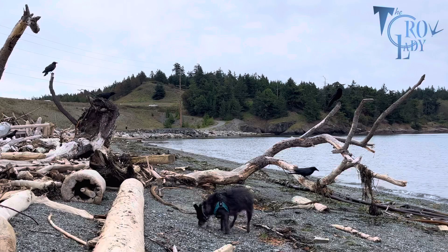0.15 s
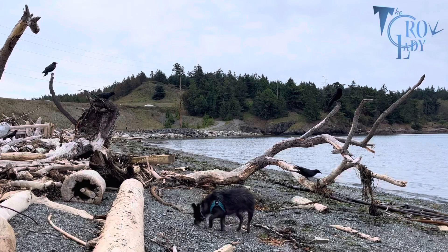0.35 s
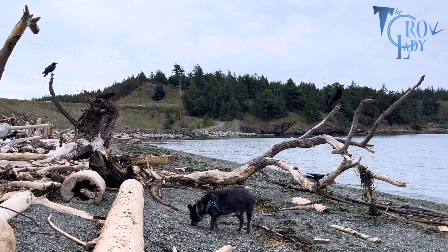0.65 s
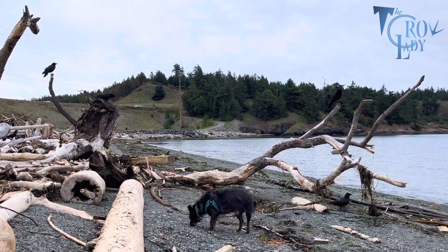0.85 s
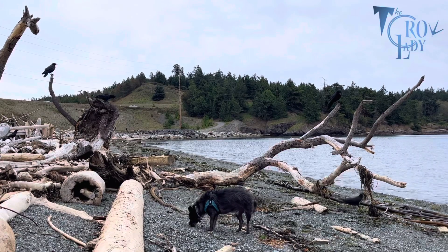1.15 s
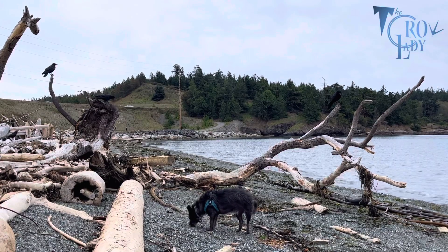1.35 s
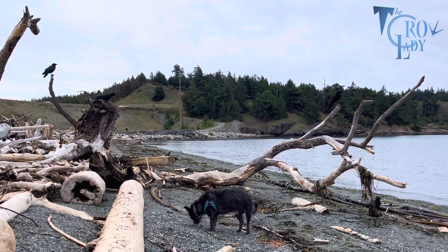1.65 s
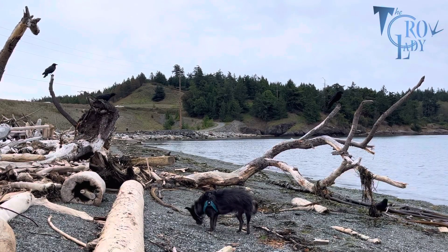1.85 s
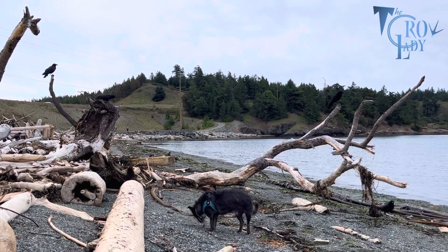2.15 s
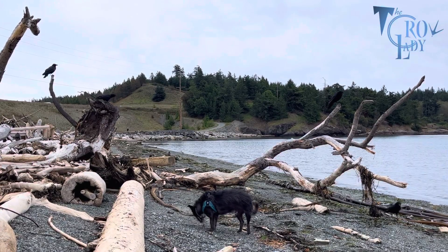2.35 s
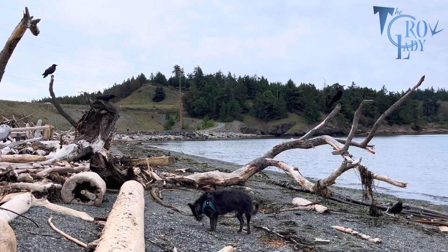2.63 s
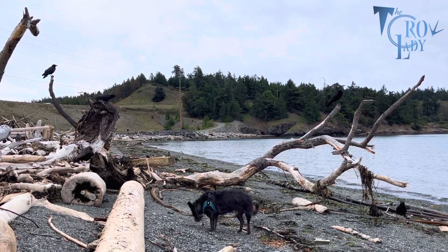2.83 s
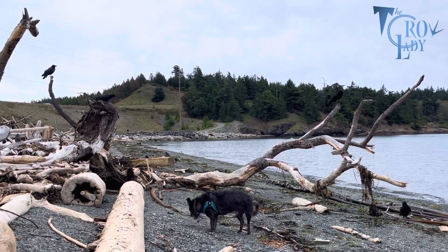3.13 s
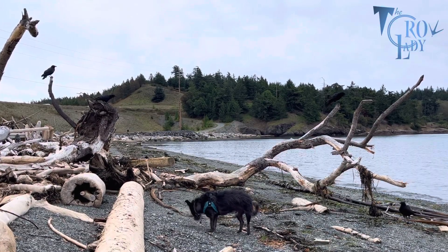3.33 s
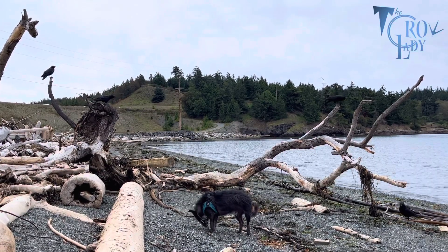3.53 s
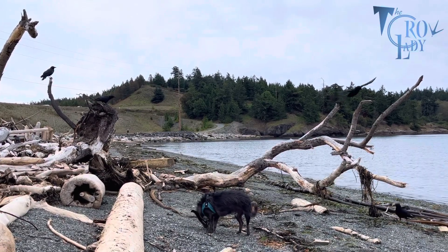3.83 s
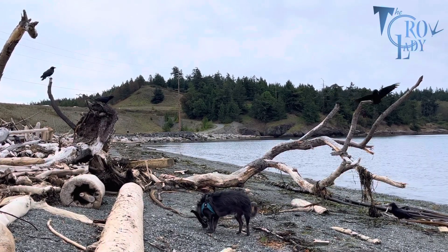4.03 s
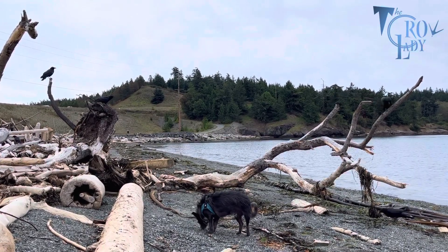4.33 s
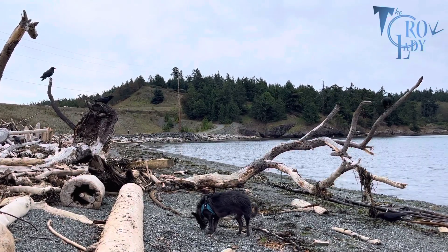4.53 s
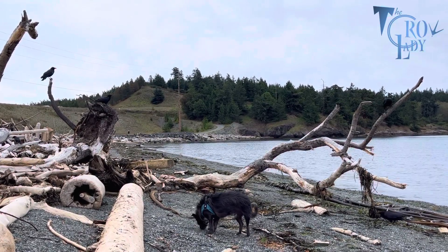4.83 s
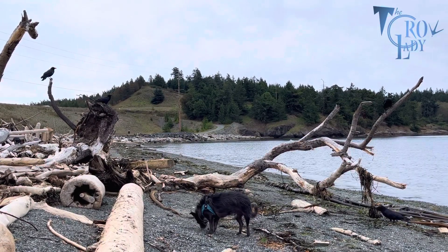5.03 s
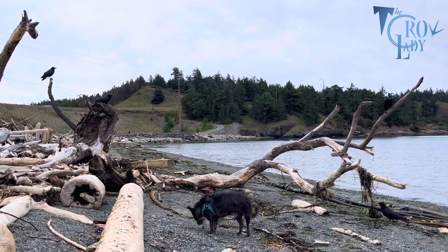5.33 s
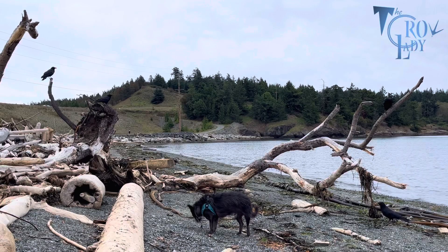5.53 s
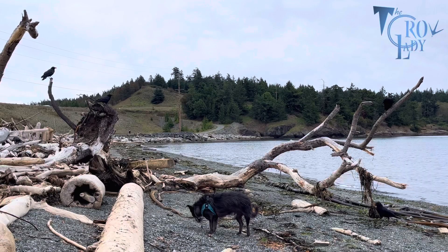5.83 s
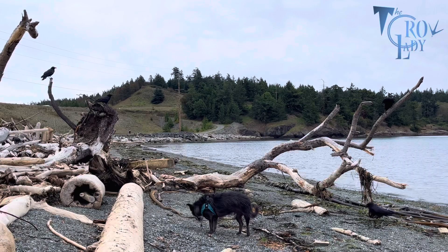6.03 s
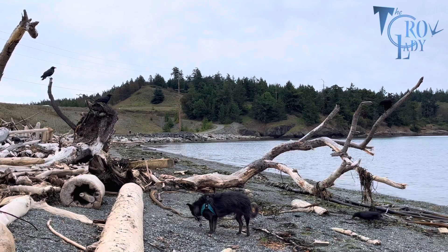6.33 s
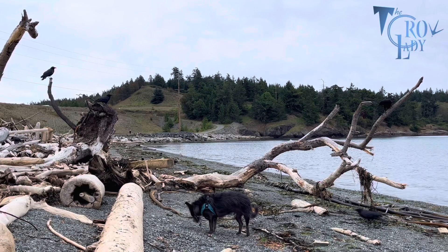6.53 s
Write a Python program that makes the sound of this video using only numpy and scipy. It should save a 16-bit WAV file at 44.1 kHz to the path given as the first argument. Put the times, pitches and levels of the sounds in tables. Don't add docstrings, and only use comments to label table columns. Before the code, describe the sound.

Six rough, evenly spaced crow caws on a shore, with a far motor humming low, water draining through gravel and pebbles clicking.

```python
import sys
import numpy as np
from scipy import signal
from scipy.fft import rfft, irfft, next_fast_len
from scipy.io import wavfile
from scipy.ndimage import uniform_filter1d

SR = 44100
rng = np.random.default_rng(int(sys.argv[2]) if len(sys.argv) > 2 else 0)


def level_to_linear(level):
    exponent = np.asarray(level, float) / 20
    return 10 ** exponent


def file_out(sig):
    cols = np.atleast_2d(sig).T
    lim = np.clip(cols, -1, 1)
    pcm = np.round(lim * 32767).astype(np.int16)
    wavfile.write(sys.argv[1], SR, pcm)


N = 294588


def evened(x):
    return x / np.sqrt(np.mean(abs(x) ** 2) + 1e-20)


def read(points, hz):
    f, value = np.transpose(points)
    return np.interp(np.log(hz + 1), np.log(f + 1), value)


def columns(rows, t):
    s, *values = np.transpose(rows)
    return [np.interp(t, s, v) for v in values]


def add(mix, s, sound):
    part = mix[..., round(s * SR):][..., :sound.shape[-1]]
    part += sound[..., :part.shape[-1]]


def port_gains(db, pan_db):
    return level_to_linear(db + np.array([[pan_db], [-pan_db]]) / 2)


def drift(count, hz):
    size = next_fast_len(count // 32 + 2)
    f = np.fft.rfftfreq(size, 32 / SR)
    shape = (f > 0) / (1 + (f / hz) ** 4)
    coarse = evened(irfft(rfft(rng.standard_normal(size)) * shape, size))
    return np.interp(np.arange(count) / 32, np.arange(size), coarse)


def summed_db(levels_db, rest_db):
    power = sum(level_to_linear(2 * db) for db in levels_db) + level_to_linear(2 * rest_db)
    coarse = 10 * np.log10(power)
    return np.interp(np.arange(N) / 64, np.arange(len(coarse)), coarse)


def noise(spectrum, same, lead, size, patchy_db, flicker_db, count=8):
    frames, hz = 4 * N // size + 5, np.fft.rfftfreq(size, 1 / SR)
    a, b, c, d, patches = rng.standard_normal((frames, len(hz), 5)).T
    patches = uniform_filter1d(patches, size=6, axis=0)
    patches = evened(uniform_filter1d(patches, size=count, axis=1))
    flicker = evened(uniform_filter1d(rng.standard_normal(frames), size=3))
    same = np.clip(same(hz), 0, 1)[:, None]
    left = a + 1j * b
    right = same * left * np.exp(-1j * lead(hz))[:, None] + np.sqrt(1 - same ** 2) * (c + 1j * d)
    level_db = read(spectrum, hz)[:, None] + patchy_db * patches + flicker_db * flicker
    z = np.array([left, right]) * level_to_linear(level_db)
    return evened(signal.istft(z, nperseg=size, noverlap=3 * size // 4)[1][:, :N])


def ring(x, hz, width):
    r = np.exp(-np.pi * width / SR)
    return 2 * signal.lfilter([1 - r], [1, -r * np.exp(2j * np.pi * hz / SR)], x).real


def twice_rung(x, hz, width):
    return ring(ring(x, hz, width), hz, width)


def glide(x, hz, width):
    turn, r = np.exp(2j * np.pi * np.cumsum(hz) / SR), np.exp(-np.pi * width / SR)
    return 2 * (turn * signal.lfilter([(1 - r) ** 2], [1, -2 * r, r ** 2], x / turn)).real


def engine(t):
    # time in seconds, firing rate in Hz, load in dB.
    running = [(0.0, 73.8, -37.5), (0.4, 70.88, -60.5), (0.82, 71, -43.5), (2.27, 70.8, -43.5),
               (2.7, 72.25, -45.5), (3.05, 75.75, -36.5), (3.31, 74.8, -33), (3.48, 79, -31.5),
               (3.74, 83.36, -35.5), (4.17, 84.94, -32.5), (6.4, 82.2, -32), (6.68, 79.54, -26)]
    # centre in seconds, half width in seconds, depth in dB.
    dips = [
        (2.97, 0.026, -8),
        (3.13, 0.035, -4.5),
        (3.38, 0.043, -28),
        (6.459, 0.033, -10),
    ]
    hz, load_db = columns(running, t)
    dip_db = sum(db * np.exp(-((t - s) / half) ** 2) for s, half, db in dips)
    main_db = load_db + dip_db
    third_db = -46 + 0.12 * (load_db - load_db.mean()) + dip_db
    turns = np.cumsum(hz + 0.29 * drift(N, hz=4.3)) / SR
    tone = np.zeros(N)
    for order, db in [(1, main_db), (1.5, third_db), (1.7, main_db - 29.5), (0.55, main_db - 31.0)]:
        level = level_to_linear(db + 2.5 + 0.93 * drift(N, hz=18.0))
        tone += level * np.sin(2 * np.pi * order * turns)
    return tone * level_to_linear([[-1.8], [1.6]])


def hum(t):
    turning_hz = 19.77
    # multiple of the turning rate, rms in dB, left lead in radians, left minus right in dB.
    lines = [(4, -44, -2.5, -2.5), (6, -46, -1, -6), (8, -57.5, 0.94, 3.5), (12, -57.5, -1.5, -1.5),
             (15, -67.5, 0, 9), (16, -71.5, 0.5, 4), (17, -63.5, 0, 4.5), (18, -71, -0.3, 10.5)]
    # time in seconds, level in dB as the air carries it.
    swell = [(0.0, -56), (0.28, -66.5), (1.05, -59), (1.8, -59.5), (2.55, -56), (3.1, -58.5), (3.9, -60.5),
             (4.26, -64), (5.0, -61.5), (5.65, -64), (6.2, -59), (6.68, -62)]
    swell_db = columns(swell, t)[0]
    out = np.zeros((2, N))
    for k, db, lead, pan_db in lines:
        angle = 2 * np.pi * (k * turning_hz * t + rng.random())
        level = level_to_linear(db + 3 + 0.9 * (swell_db - swell_db.mean()) + 1.2 * drift(N, hz=2.0))
        out += level * np.array([np.sin(angle + lead), np.sin(angle)]) * port_gains(0, pan_db)
    return out


def shore(t):
    # time in seconds, level of the far wash in dB.
    far_wash = [(0, -60.5), (1.2, -62), (1.6, -58.5), (2.9, -59), (4.5, -61.5), (5.1, -63.5), (5.75, -64),
                (5.94, -59.5), (6.15, -67.5), (6.68, -56.5)]
    # arrival in seconds, drain in seconds until it thins out, fizz in dB, spray in dB.
    waves = [(0.01, 0.1, -74, -77), (0.1, 0.41, -63.5, -74.5), (0.5, 0.39, -63, -71.5),
             (0.9, 0.32, -65, -72.5), (1.3, 0.55, -65.5, -79.5), (2.88, 0.54, -63, -69.5),
             (3.66, 0.42, -62.5, -73), (4.2, 0.39, -68.5, -81), (5.25, 0.27, -74, -80),
             (5.74, 0.13, -70, -82), (5.92, 0.46, -65.5, -75.5), (6.14, 0.14, -65.5, -79)]
    # frequency in Hz, level in dB.
    wash_spectrum = [(150, -37), (255, -0.5), (277, -21.5), (344, -4.5), (385, -31), (418, -11),
                     (594, -18.5), (645, -13), (975, -15), (1260, -21), (1370, -20), (1580, -30),
                     (3000, -42), (3900, -53), (6600, -120)]
    # frequency in Hz, level in dB.
    fizz_spectrum = [(760, -14.5), (1300, 1.5), (1940, -4), (2110, -8.5), (2800, -8.5), (3140, -7.5),
                     (4300, -10.5), (5370, -14), (6090, -16), (9560, -22), (11300, -17), (13200, -53),
                     (13700, -31), (14400, -17.5), (15700, -25), (16100, -70.5)]
    # frequency in Hz, likeness of the two ports from 0 to 1.
    likeness = [(100, 0.6), (600, 0.16), (1500, 0.86), (2100, 0.18), (3300, 0.53), (5500, 0.12), (8500, 1),
                (12000, 0.85)]
    # frequency in Hz, left lead in radians.
    port_lead = [(0, -1.5), (520, -3), (1030, -1.37), (1720, -3), (2930, -8.5), (3450, -8), (4310, -12.5),
                 (4910, -9), (6460, -8.5), (8440, -11), (11800, -16), (13700, -13), (14900, -17.5),
                 (16500, -20.5)]
    surge_s, fizz_sag, spray_sag, thin = 0.095, -2, -17.5, -55.5

    wash_db = columns(far_wash, t)[0]
    t = t[::64]
    fizz_rows, spray_rows = [], []
    for s, drain_s, wave_fizz_db, wave_spray_db in waves:
        after = np.maximum(t - s, 0)
        shape_db = 12 * np.minimum(t - s, 0) / surge_s + thin * np.maximum(t - s - drain_s, 0)
        fizz_rows.append(wave_fizz_db + shape_db + fizz_sag * after)
        spray_rows.append(wave_spray_db + shape_db + spray_sag * after)
    fizz_db = summed_db(fizz_rows, -80)
    spray_db = summed_db(spray_rows, -85)

    def same(hz):
        return read(likeness, hz)

    def lead(hz):
        return read(port_lead, hz)

    wash = noise(wash_spectrum, same, lead, size=1024, patchy_db=3.0, flicker_db=0.0)
    bubbles = noise(fizz_spectrum, same, lead, size=256, patchy_db=1.8, flicker_db=1.2, count=36)
    fizz = signal.sosfilt(signal.butter(4, 7000, "low", fs=SR, output="sos"), bubbles)
    spray = signal.sosfilt(signal.butter(4, 7000, "high", fs=SR, output="sos"), bubbles)
    out = level_to_linear(wash_db + 6.5) * wash
    out += level_to_linear(fizz_db + 4) * evened(fizz)
    out += level_to_linear(spray_db + 6.0) * evened(spray)
    return out + trickle(fizz_db)


def trickle(fizz_db):
    pitches_hz, ticks_per_s = [2700, 4200, 4240, 4800, 5300, 5300], 400
    from_s, to_s, runnel_db = 5.71, 6.22, 8.5
    in_runnel = abs(np.arange(N) / SR - (from_s + to_s) / 2) < (to_s - from_s) / 2
    size_db = 2.4 * np.minimum(rng.exponential(1, N), 4)
    ticks = level_to_linear(size_db + fizz_db + runnel_db * in_runnel) * (rng.random(N) < ticks_per_s / SR)
    kind, out = rng.integers(0, len(pitches_hz), N), np.zeros((2, N))
    for k, hz in enumerate(pitches_hz):
        out += twice_rung(ticks * (kind == k), hz, 450.0) * level_to_linear([[2.5 * (-1) ** k], [0]])
    return level_to_linear(22.5) * out


def drops():
    # start in seconds, peak in dB, ring in Hz, left minus right in dB.
    bursts = [(0.0333, -52, 9050, 0.0), (0.4364, -50, 9480, -2.5), (0.7542, -49, 8120, -5),
              (1.2425, -55, 9080, -9), (1.3833, -58, 9180, -13), (3.3159, -57, 8390, 0.5),
              (3.3992, -62, 9640, -1.0), (3.4389, -66, 9560, -2), (3.464, -60, 10000, -3.5),
              (3.482, -58, 9790, -1.0), (3.5014, -55, 8620, 0.5), (3.8906, -59, 8980, -1.0),
              (4.7411, -59.5, 9510, 2), (5.2644, -59, 8370, -1.0), (5.2989, -58, 9030, -4),
              (5.582, -62, 8870, -2.0), (5.8894, -59, 8100, 0.5), (6.0177, -62, 9330, -3.5),
              (6.0566, -57, 8690, -5.5), (6.1404, -54, 8900, -7), (6.1858, -55, 8880, -9),
              (6.3081, -62, 9700, -20), (6.6518, -66.5, 8350, -7.5)]
    out, t = np.zeros((2, N)), np.arange(400) / SR
    for s, peak_db, hz, pan_db in bursts:
        burst = rng.standard_normal(400) * (1 - np.exp(-t / 0.0004)) * np.exp(-t / 0.0015)
        tick = twice_rung(burst, hz, 2600.0) + 0.35 * twice_rung(burst, 14700.0, 1500.0)
        add(out, s, port_gains(peak_db - 1.0, pan_db) * tick / abs(tick).max())
    return out


def wind(t):
    # centre in seconds, half width in seconds, slow pressure in dB, flutter in dB.
    gusts = [(0.085, 0.021, -41, -69), (0.22, 0.04, -38.5, -39), (0.65, 0.095, -65, -55),
             (1.06, 0.056, -52, -44), (1.35, 0.27, -61, -49.5), (1.8, 0.1, -57, -55),
             (2.08, 0.12, -46.5, -54), (2.42, 0.12, -53.5, -49.5), (2.64, 0.05, -45, -59),
             (2.89, 0.055, -48.5, -42.5), (3.14, 0.21, -45.5, -53), (3.5, 0.11, -52, -48),
             (3.93, .03, -43, -37.5), (4.02, .07, -42, -38), (4.3, .12, -43.5, -47),
             (4.9, 0.069, -45.5, -47), (5.121, 0.069, -53.5, -48.5), (5.319, 0.051, -52, -48),
             (5.53, 0.054, -47, -51), (5.7, 0.062, -47, -45), (5.85, 0.11, -42, -44.5),
             (6.1, 0.09, -41.5, -42), (6.32, 0.047, -41.5, -51.5), (6.42, .04, -55, -46),
             (6.64, 0.069, -41, -54)]
    # frequency in Hz, level in dB.
    buffet_spectrum = [(15, -59.5), (30, -32.5), (42, -7), (55, 3.5), (85, 5.5), (125, -6), (180, -21.5),
                       (300, -40), (500, -69)]
    # frequency in Hz, level in dB.
    flutter_spectrum = [(60, -40), (110, 4.5), (150, -3), (200, -9), (260, -10), (340, -22), (500, -35.5),
                        (700, -70)]
    t = t[::64]
    slow_rows, flutter_rows = [], []
    for s, half, gust_slow_db, gust_flutter_db in gusts:
        shape_db = -6 * np.minimum(abs(t - s) / half, 9) ** 1.28
        slow_rows.append(gust_slow_db + shape_db)
        flutter_rows.append(gust_flutter_db + shape_db)
    slow_db = summed_db(slow_rows, -57)
    flutter_db = summed_db(flutter_rows, -53.5)
    buffet = noise(buffet_spectrum, lambda hz: 0.3 + 0 * hz, lambda hz: 0 * hz,
                   size=2048, patchy_db=1.8, flicker_db=0.5)
    flutter = noise(flutter_spectrum, lambda hz: 0.25 + 0 * hz, lambda hz: 0 * hz,
                    size=1024, patchy_db=2.2, flicker_db=1.0)
    return level_to_linear(slow_db + 9.0) * buffet + level_to_linear(flutter_db + 0.5) * flutter


def breath(t, length, top_db, top_hz, swell_s, beak_db, air_db):
    after = np.maximum(t - swell_s, 0)
    push_db = np.interp(t, [0, 0.36 * swell_s, swell_s], [-10, -4, 0]) - 57.5 * after
    push_db = push_db - 13.5 * np.maximum(1 - (length - t) / 0.034, 0)
    shut_db = -0.5 * np.maximum(1 - t / swell_s, 0)
    rate_share = np.maximum(np.interp(t, [0, swell_s], [0.9, 1]) - 1.75 * after, 0.62)
    effort_db = np.maximum(push_db, -16)
    beak_db = beak_db + shut_db + 1.37 * effort_db
    air_db = air_db + shut_db + 0.3 * effort_db
    return top_db + push_db, top_hz * rate_share, beak_db, air_db


def throat(drive, beak_db, air_db, shut, after, head):
    # resonance in Hz, width in Hz, level in dB, share of the beak control.
    resonances = [(1058, 363, -4, 0.6), (1490, 470, 1, 0.3), (1890, 420, -3.5, 0.6),
                  (2398, 168, -3.5, 0.78), (3110, 310, -4.5, 1), (3482, 222, 0, 0.45),
                  (4260, 260, -17.5, 0.8), (4836, 250, -12, 0.14), (6000, 320, -5, 0.1),
                  (6765, 210, -8, 0.4), (7560, 1900, -24.5, 0.3), (9250, 1200, -25.5, 0.6),
                  (14600, 500, -33, 2.5)]
    slides = [(0.07, 0.0084), (0.1, 0.28), (0.065, 0.031), (0.04, 0.28), (.0, 0.31), (0.012, .0),
              (0.035, .0), (0.016, .0), (0.0029, .0), (0.008, 0.071), (0.0049, .0), (.0, .0),
              (0.0062, 0.022)]
    head_db = np.pad(head, (0, len(resonances) - len(head)))
    out = 0
    for k, ((hz, width, db, share), (low, sink)) in enumerate(zip(resonances, slides)):
        gain = (-1) ** k * level_to_linear(db + head_db[k] + share * beak_db + (hz > 5500) * air_db)
        out = out + gain * glide(drive, hz * (1 - low * shut - sink * after), width * 1.63)
    return out


def caw(row, beak, head, unlock_s, climb_hz, rough):
    start, length, _, _, swell_s = row
    t = np.arange(start, start + length, 1 / SR)
    count = len(t)
    effort_db, hz, beak_db, air_db = breath(t - start, *row[1:], *beak)
    tremble = drift(count, hz=55.0) - 0.5 * drift(count, hz=18.0)
    hz = hz * (1 + 0.022 * tremble + 0.007 * drift(count, hz=250.0))
    turns = np.cumsum(hz) / SR
    free = np.maximum(t - unlock_s, 0)
    slip = climb_hz * free ** 2 / 2
    k = np.arange(-8, 54)[:, None]
    heard = k * hz + climb_hz * free > 200
    spread = 0.005 * k ** 2
    first = (heard * np.cos(2 * np.pi * (k * turns + slip + spread))).sum(axis=0)
    other_turns = turns + 0.46 + 0.025 * drift(count, hz=41.0)
    second = (heard * np.cos(2 * np.pi * (k * other_turns + slip + spread))).sum(axis=0)
    folds = first + level_to_linear(-3.0 + 0.9 * drift(count, hz=40.0)) * second
    puffs = (1.1 + np.exp(-(2 * turns % 1) / 0.13)) * rng.standard_normal(count)
    drive = (1 - rough) * evened(folds) + rough * evened(puffs)
    shut = np.maximum(1 - (t - start) / swell_s, 0)
    after = np.maximum(t - start - swell_s, 0)
    voice = throat(drive, beak_db, air_db, shut, after, head)
    steady = voice / np.sqrt(uniform_filter1d(voice ** 2, size=700) + 1e-9)
    steady = steady + level_to_linear(-22.5) * np.sin(2 * 2 * np.pi * turns)
    level = level_to_linear(effort_db + 1.73 * drift(count, hz=132.0))
    return level * steady * signal.windows.tukey(count, 0.015)


def creak(peak_db):
    n = np.arange(600)
    puff = (rng.standard_normal(600) + 4.0 * (n == 3)) * np.exp(-n / 40.0)
    pulse = throat(puff, -10.0, -3.5, np.ones(600), 0, [-3.0, 0.4, -3.0, -3.0, -0.5, 1.0, -3.0, -6.0])
    pulse = pulse + level_to_linear(5.0) * ring(pulse, 1230.0, 130.0)
    return level_to_linear(peak_db - 1.0) * pulse / abs(pulse).max()


def from_driftwood(call):
    # frequency in Hz, left lead in radians.
    bird_lead = [(500, 1.3), (800, 1.07), (1400, 1), (1750, 4), (2000, 4.5), (2300, 5), (3100, 8.5),
                 (3900, 8), (4250, 14.5), (5200, 13.5), (5600, 11), (6300, 17.5), (7600, 16.5), (10500, 18)]
    # frequency in Hz, left minus right in dB.
    bird_tilt = [(500, 1), (850, 4.5), (1400, 0), (1900, 9.5), (2250, 6.5), (2800, -10), (3200, 6),
                 (4000, -4), (4500, 6.5), (5300, 3.5), (6100, -6), (6800, -2.5), (7300, -3.5), (8000, 4)]
    size = next_fast_len(N)
    hz, t = np.fft.rfftfreq(size, 1 / SR), np.arange(9000) / SR
    tilt = level_to_linear(read(bird_tilt, hz) / 2)
    ports = np.array([tilt, np.exp(-1j * read(bird_lead, hz) * (hz < 7400)) / tilt])
    direct = irfft(rfft(call, size) * ports, size)[:, :N]
    scatter = rng.standard_normal((2, 9000)) * level_to_linear(-60 * t / 0.12) * (t > 0.002)
    scatter /= np.linalg.norm(scatter[0])
    off_logs = signal.fftconvolve(ring(call, 1300.0, 4800.0)[None], scatter, axes=1)[:, :N]
    return level_to_linear(2.0) * direct + level_to_linear(-12.5) * off_logs


def crow():
    # start in seconds, length in seconds, top effort in dB, top pulse rate in Hz,
    # swell in seconds up to the top.
    caws = [
        (0.177, .25, -35.5, 231.2, 0.057),
        (0.913, 0.23, -33, 236.1, 0.03),
        (1.443, 0.22, -32, 259.3, 0.03),
        (2.114, 0.235, -33.5, 241.8, 0.032),
        (2.777, .255, -32.5, 235.4, 0.049),
        (3.53, 0.25, -32, 255.2, 0.042),
    ]
    # beak opening at the top as dB of the upper throat, airy top in dB.
    beaks = [(1, -5.5), (0.5, -1), (3.5, -2), (3, -2), (4.5, 3), (4, -1.5)]
    heads = [(0.8, -1, -1, 1, 0.25, -1.5), (0, 0.96, -1, .1, 0, .1), (0.23, -0.4, -0.5, 1, 0, -0.042),
             (-0.81, 2, -3, .1, -0.22, -0.013), (0.42, -1, 1, 1.7, 0, -0.49),
             (0.084, -1.7, 2.5, 3.5, -1.8, -0.42)]
    # time in seconds at which the two sides unlock, climb of their lines in Hz per second,
    # roughness from 0 to 1.
    unlocking = [(.34, 3000, .28), (1.03, 3500, .36), (1.54, 4500, .31), (2.2, 1200, .31),
                 (2.89, 2800, .32), (3.63, 4500, .32)]
    # time in seconds, peak in dB.
    creaks = [(0.151, -43), (0.168, -31), (0.883, -44), (0.894, -30), (0.908, -27.5), (1.424, -39),
              (1.437, -30), (2.106, -34.5), (2.757, -47), (2.768, -30.5), (3.512, -43), (3.524, -33)]
    call = np.zeros(N)
    for row, beak, head, habit in zip(caws, beaks, heads, unlocking):
        add(call, row[0], caw(row, beak, head, *habit))
    for s, peak_db in creaks:
        add(call, s, creak(peak_db))
    return from_driftwood(call)


def thumps():
    # start in seconds, peak in dB, left minus right in dB.
    pushes = [(0.202, -36.5, 3), (3.269, -40, 5), (3.918, -35.5, 3), (3.975, -34.5, 3), (4.031, -40, 5.0),
              (4.266, -39, 3), (4.901, -37.5, 1), (5.359, -44, -3.5), (5.662, -39.5, 2), (5.808, -35, 5.5),
              (5.999, -43, -1), (6.076, -34, 1.0), (6.449, -42.5, -2.0), (6.553, -37.5, 2)]
    out, t = np.zeros((2, N)), np.arange(3500) / SR
    for s, peak_db, pan_db in pushes:
        push = twice_rung(rng.standard_normal((2, 3500)), 200.0, 170.0)
        push = push * (1 - np.exp(-t / 0.006)) * np.exp(-t / 0.022)
        add(out, s, port_gains(peak_db - 3.0, pan_db) * push / abs(push).max(axis=1, keepdims=True))
    return out


def pebbles():
    # start in seconds, peak in dB, ring in Hz, left minus right in dB.
    small = [(0.4407, -49.5, 4270, 4), (0.7843, -48.5, 4200, 3), (1.177, -56, 5720, 2.0),
             (2.3644, -60, 2690, 4), (2.4207, -61, 2480, 5), (2.485, -61, 2514, 0), (2.546, -65, 2920, 15),
             (2.6152, -80, 2570, -7), (2.6594, -80, 2600, 8), (4.115, -43.5, 3360, -7),
             (4.1236, -46.5, 4235, 12), (4.261, -45.5, 4200, 2), (4.4181, -66, 4370, -1),
             (4.5144, -51, 5860, 4), (4.5475, -60, 2700, -6), (4.555, -43, 5000, 8), (4.594, -56, 3346, -4),
             (4.606, -55.5, 4260, 12), (4.7391, -69, 2530, 7), (5.2807, -56, 2510, 5),
             (5.472, -53.5, 3390, 0), (6.1695, -49, 2700, 7), (6.2817, -62, 2883, 2),
             (6.3122, -63, 2660, 2), (6.367, -44.5, 4050, 6)]
    # start in seconds, peak in dB, ring in Hz, left minus right in dB.
    large = [
        (4.121, -46, 1132, 0.55),
        (6.279, -46.5, 1260, 1.8),
    ]
    out, t = np.zeros((2, N)), np.arange(700) / SR
    for s, peak_db, hz, pan_db in small + large:
        burst = rng.standard_normal((2, 700)) * (1 - np.exp(-t / 0.0006)) * np.exp(-t / 0.0023)
        burst = burst[0] + 0.24 * burst
        knock = twice_rung(burst, hz, 900.0) + 0.19 * twice_rung(burst, 1.3 * hz, 5200.0)
        add(out, s, port_gains(peak_db + 2.5, pan_db) * knock / abs(knock).max())
    return out


def scene():
    t = np.arange(N) / SR
    background = engine(t) + hum(t) + shore(t) + wind(t)
    return background + drops() + crow() + thumps() + pebbles()


def low_pass(x):
    return signal.sosfilt(signal.butter(12, 16860, fs=SR, output="sos"), x)


def record(dry):
    # frequency in Hz, level in dB under which a band is dropped.
    gate = [(1000, -110), (1600, -99), (3000, -103), (6000, -102), (7500, -98), (9000, -107), (11500, -101),
            (13000, -93), (15000, -100)]
    padded = np.pad(dry, [(0, 0), (0, 2048)], "reflect")
    hz, _, z = signal.stft(padded, SR, nperseg=1024, noverlap=512)
    power = (abs(z[:, :512]) ** 2).mean(axis=0)
    band_db = 10 * np.log10(power.reshape(64, 8, -1).mean(axis=1) + 1e-20)
    masked_db = np.maximum(band_db[2:].max(axis=0) + 59.0, 0) * 0.19
    luck_db = 3.2 * evened(uniform_filter1d(rng.standard_normal(band_db.shape), size=7, axis=1))
    band_db = (band_db + luck_db).repeat(8, axis=0)
    short_db = read(gate, hz[:512])[:, None] + masked_db - band_db
    z[:, :512] *= 1 / (1 + level_to_linear(1.65 * np.clip(short_db, -20, 20)))
    gated = signal.istft(z, SR, nperseg=1024, noverlap=512)[1][:, :N]
    low_cut = signal.sosfilt(signal.butter(2, 30, "high", fs=SR, output="sos"), gated)
    end_dip = np.clip(0.3 + (N - np.arange(N)) / 900, 0, 1)
    return low_pass(low_cut * end_dip)


dry = scene()
out = record(dry)
file_out(out)
```